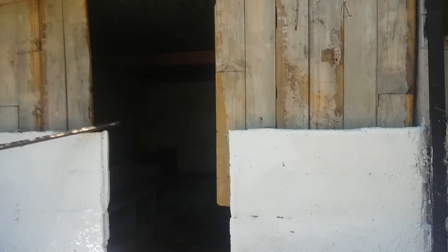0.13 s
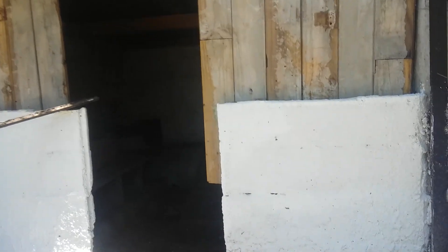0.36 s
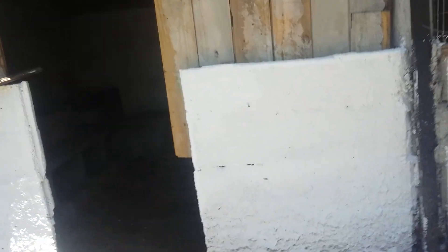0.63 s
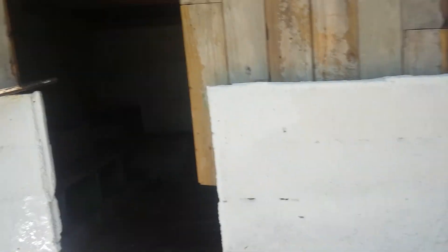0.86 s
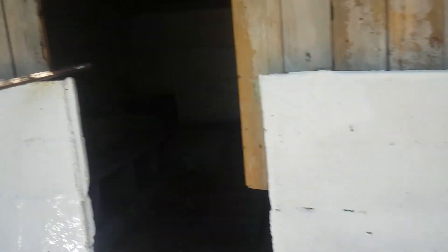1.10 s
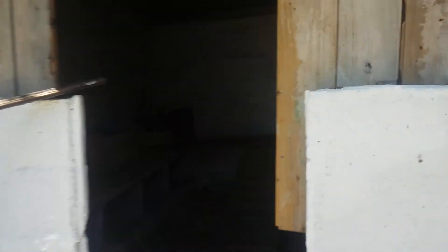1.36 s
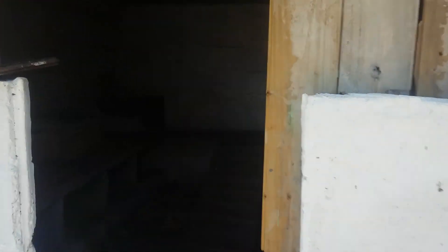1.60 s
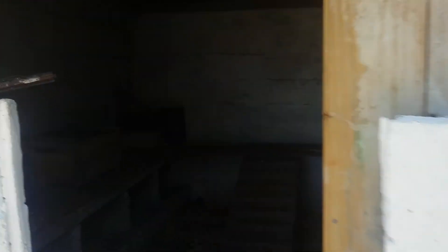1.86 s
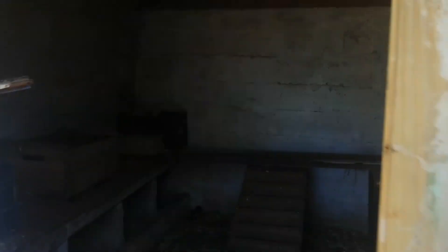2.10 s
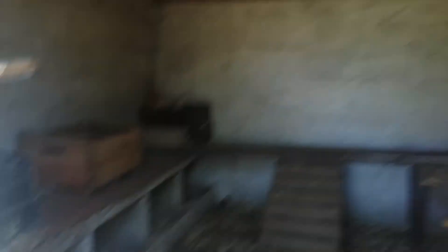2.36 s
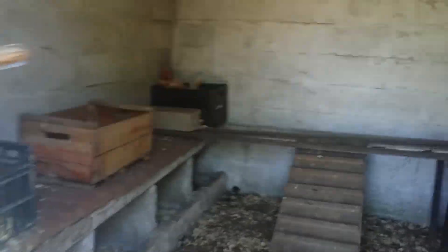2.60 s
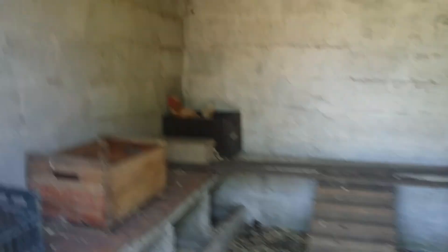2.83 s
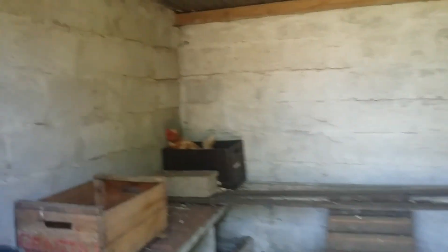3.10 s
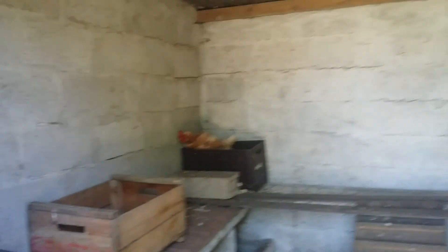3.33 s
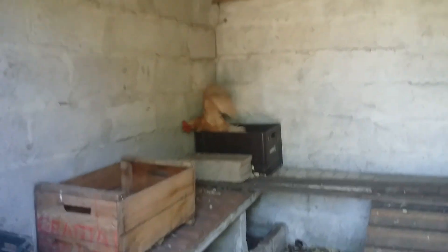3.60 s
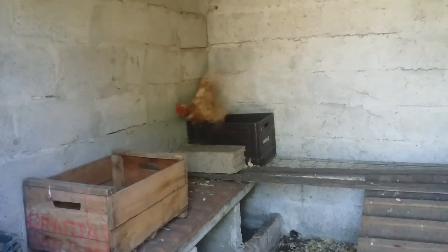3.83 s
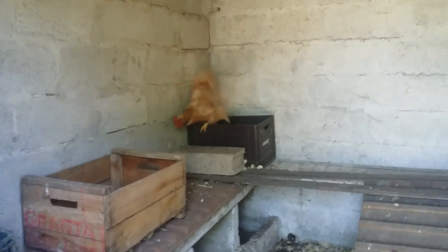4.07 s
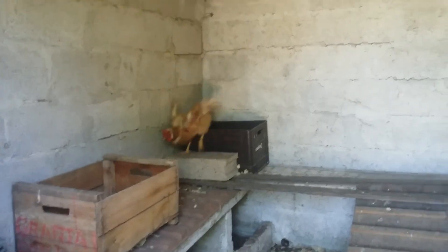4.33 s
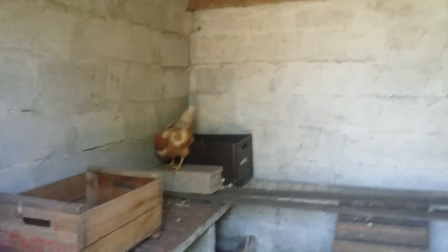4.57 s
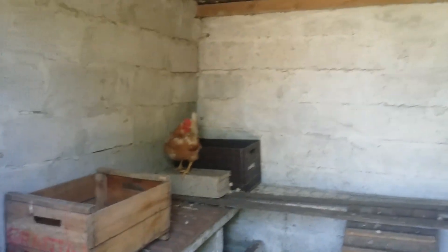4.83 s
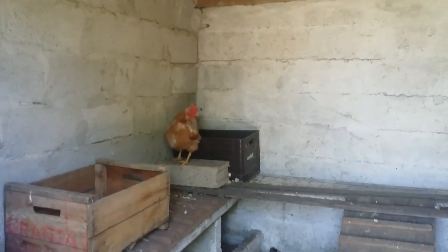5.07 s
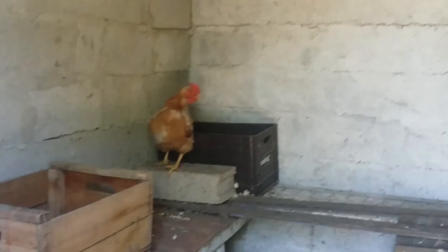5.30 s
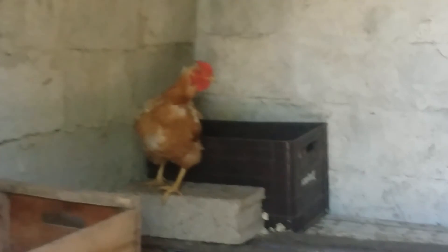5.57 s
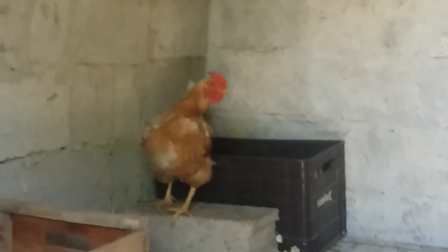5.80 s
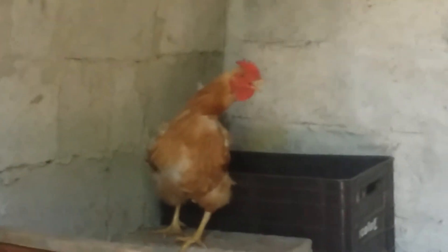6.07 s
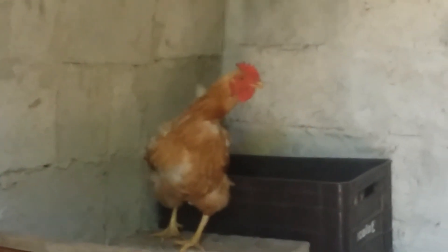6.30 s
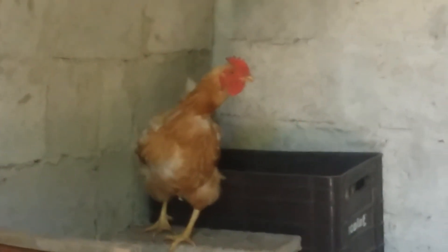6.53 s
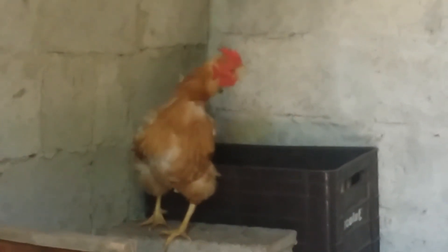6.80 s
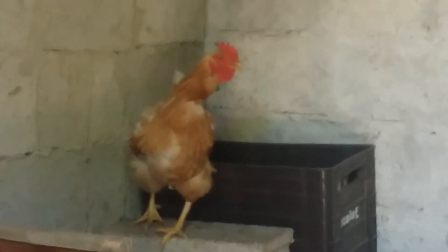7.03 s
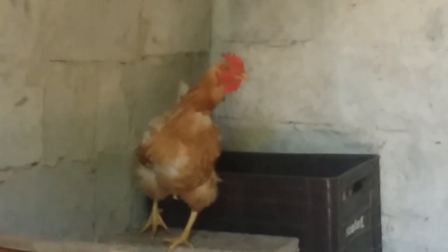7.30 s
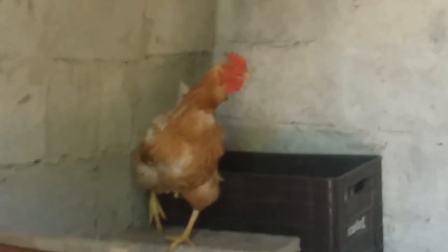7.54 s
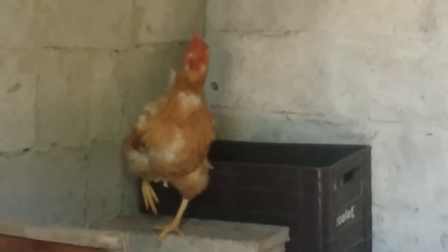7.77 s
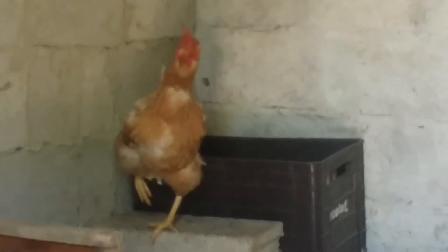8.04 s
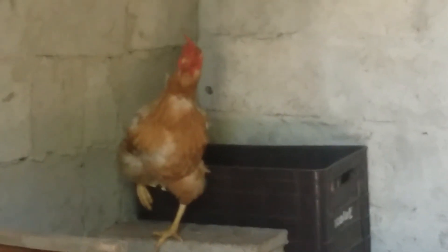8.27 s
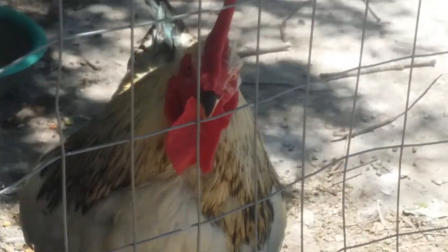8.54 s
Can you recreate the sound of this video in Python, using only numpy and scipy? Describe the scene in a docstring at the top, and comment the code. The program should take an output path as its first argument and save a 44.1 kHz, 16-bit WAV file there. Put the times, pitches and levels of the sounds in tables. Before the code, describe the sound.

A handheld microphone moves into a small block-walled coop, wind rumbling in uneven gusts over a soft yard hush. In the first 1.5 seconds, dull knocks and gritty scuffs mix with low hen clucks, soft fowl murmurs and faint falling sparrow chirps. From 1.5 to 2 seconds the hen gives a long cry that roughens into a rasp, then a firmer cluck at 2.2. A second fowl squeals thin and high around 2.5 and faintly at 2.8. From 3.7 to 4.2 wings beat in airy puffs as a loud squawk breaks into pieces, followed by a short yelp at 4.3. Quieter clucks lead to a hard knock near 5.15 and another held cry until 5.6. Then come steady, stronger clucks with loud, higher cackles at about 6.1, 6.9, 7.3 and 7.7. At 8.47 a dry click cuts the birds off; their brief echo fades, a small scuff follows and wind continues.

```python
"""Wind rumbles on a hand-held microphone carried into a small block-walled coop (shaped noise); feet scuff and knock.
Fowl murmur, sparrows chirp outside (falling tones) and a hen clucks, then cries (throat pulses and hissing air).
A second fowl squeals by the door; the hen flaps out of a crate (noise puffs), squawking, and yelps.
She cries again, then cackles among her clucks. Near the end the birds are cut off with a dry click
and their echo dies away, while the wind goes on."""
import sys
import numpy as np
from scipy import signal
from scipy.fft import rfft, irfft, next_fast_len
from scipy.io import wavfile
from scipy.ndimage import uniform_filter1d, minimum_filter1d, map_coordinates

SR = 44100
rng = np.random.default_rng(int(sys.argv[2]) if len(sys.argv) > 2 else 0)


def output_pcm(signal):
    """Save a mono or channel-first signal as 16-bit PCM at the path in sys.argv[1].

    Samples are clipped to [-1, 1] before scaling.
    """
    pcm = np.clip(np.atleast_2d(signal).T, -1, 1) * 32767
    wavfile.write(sys.argv[1], SR, np.round(pcm).astype(np.int16))


def gain_from_db(level_db):
    """Convert decibel levels to linear amplitude factors (20 dB per decade)."""
    decades = np.asarray(level_db, float) / 20
    return 10 ** decades


N = 381465  # length in samples


def unit(x):
    """Scales a sound to an average (rms) strength of 1."""
    return x / np.sqrt(np.mean(x ** 2) + 1e-20)


def along(points, hz):
    """Reads a curve of (Hz, value) points, with frequency on a log scale."""
    f, v = np.transpose(points)
    return np.interp(np.log(hz + 1), np.log(f + 1), v)


def wobble(rate, size):
    """Draws a smooth random curve with rate random points a second."""
    points = rng.standard_normal(int(size * rate / SR) + 4)
    return map_coordinates(points, [np.arange(size) * rate / SR])


def coloured(x, spectrum):
    """Filters x to the given (Hz, dB) colour without any ringing ahead of the sound."""
    m = 2 * next_fast_len(len(x) // 2 + 2048)
    gain = gain_from_db(along(spectrum, np.fft.rfftfreq(m, 1 / SR)))
    # folding the cepstrum forward in time makes the filter react only after its input
    cepstrum = irfft(np.log(gain + 1e-6), m)
    cepstrum[1:m // 2] *= 2
    cepstrum[m // 2 + 1:] = 0
    return irfft(rfft(x, m) * np.exp(rfft(cepstrum)), m)[:len(x)]


def noise(size, spectrum):
    """Makes random noise of the given (Hz, dB) colour."""
    return coloured(rng.standard_normal(size), spectrum)


def add(track, start, x):
    """Mixes x into the track from sample start."""
    track[start:start + len(x)] += x[:len(track) - start]


def spans(calls):
    """Gives each call's first sample and one value per sample for each column."""
    for rows in calls:
        s, *columns = np.transpose(rows)
        t = np.arange(round(s[0] * SR), round(s[-1] * SR)) / SR
        yield round(s[0] * SR), [np.interp(t, s, c) for c in columns]


def resonance(x, hz, width_hz, lift_db):
    """Lifts a band whose centre moves with time, as a mouth changing shape does."""
    f, t, z = signal.stft(x, SR, nperseg=512, noverlap=384)
    centre = np.interp(t * SR, np.arange(len(x)), hz)
    lift = gain_from_db(lift_db * np.exp(-((f[:, None] - centre) / width_hz) ** 2))
    return signal.istft(z * lift, SR, nperseg=512, noverlap=384)[1][:len(x)]


def voice(calls, throat, throb, jitter, flutter_db, lift_db):
    """Pulses at twice the half pitch; a slower swing shifts and sizes them; air hisses at each pulse."""
    out = np.zeros(N)
    for start, (db, hz, uneven, rough, beak_db, mouth_hz) in spans(calls):
        n = len(db)
        uneven, rough = np.clip(uneven, 0, 2.5), np.clip(rough, 0, 1)
        # the voice breaks up where it is faint
        rough = np.maximum(rough, np.clip((db.max() - db - 5.5) / 22, 0, 0.8))
        shaky_hz = hz * (1 + jitter * rough * wobble(120, n) + 0.0031 * wobble(25, n))
        turn = 2 * np.pi * np.cumsum(shaky_hz) / SR
        swing = throb * turn + rng.uniform(0, 2 * np.pi)

        overtone = np.arange(1, 7200 // hz.max())[:, None]
        phase = overtone * (2 * turn + 0.62 * uneven * np.sin(swing))
        buzz = np.cos(phase + rng.uniform(0, 3.46, overtone.shape)).sum(0)
        # the swing fills in lines between the overtones
        buzz = buzz * (1 + 0.45 * uneven * np.cos(swing))
        hiss = rng.standard_normal(n) * (1 + 0.83 * np.cos(2 * turn)) * (1 + 0.5 * np.cos(swing))

        tone = unit(resonance(coloured(buzz, throat), mouth_hz, 150, lift_db))
        breath = unit(resonance(coloured(hiss, throat), mouth_hz, 150, lift_db))
        flutter = gain_from_db(flutter_db * rough * np.tanh(wobble(59, n)))
        sound = (np.sqrt(1 - rough) * tone + np.sqrt(rough) * breath) * flutter
        # a wider beak lets more treble out
        bright = coloured(sound, [(1200, -43.5), (1900, -1.5), (5000, 2.5)])
        ends = np.minimum(1, np.minimum(np.arange(n), n - np.arange(n)) / 70)
        add(out, start, gain_from_db(db) * ends * (sound + (gain_from_db(beak_db) - 1) * bright))
    return out


def by_rule(rows, jump_s, onset_db, jump_db, hold_s, sag_db, release_s, end_db, climb, sink,
            uneven, rough, beak_db, peak_beak_db, beak_per_db):
    """A call jumps in, swells to its peak, sags and dies; its pitch climbs with the swell, then sinks."""
    for s, rise, db, hz, mouth_hz in rows:
        jump = min(jump_s, rise / 2)
        times = s + np.cumsum([0, jump, rise - jump, hold_s, release_s])
        levels = [onset_db, jump_db, 0, sag_db, end_db]  # dB relative to the peak
        lows = [climb, climb, 0, sink / 2, sink]  # share by which the pitch is lowered
        top_db = peak_beak_db + beak_per_db * (db + 18.5)  # the beak's treble depends on loudness
        beaks = [beak_db, beak_db, top_db, top_db, beak_db]
        yield [(t, db + under, hz * (1 - low), uneven, rough, beak, mouth_hz)
               for t, under, low, beak in zip(times, levels, lows, beaks)]


def held(calls, rasp, beak_db, narrows_db):
    """Strain makes a held call uneven and, by the share rasp, rough; it narrows the beak."""
    return [[(s, db, hz, strain, rasp * strain, beak_db - narrows_db * strain, mouth_hz)
             for s, db, hz, strain, mouth_hz in rows] for rows in calls]


def air():
    """Lumpy, gusty wind on the microphone over the soft hush of the yard and the microphone's own hiss."""
    # wind strength before gusts and lumps: time_s, rumble_db
    wind = [(0, -41), (1.5, -44.5), (2.2, -33.5), (2.5, -43), (3.2, -37), (3.4, -51), (3.9, -42.5),
            (5, -46), (5.4, -53), (8.65, -51)]
    # gusts on top, each rising and falling in a straight line: middle_s, lift_db, half_length_s
    gusts = [(.01, 3.5, 0.08), (.65, 7, 0.18), (1.015, 13.5, 0.064), (1.573, 8.5, 0.17), (2.414, 11, 0.08),
             (2.943, 14, .15), (3.225, 2, .05), (3.43, 9.5, 0.055), (3.72, 3, .06), (4.038, 7, 0.19),
             (5.164, 16.5, 0.15), (5.704, 14, 0.062), (5.875, 12.5, 0.092), (7.37, 6.5, 0.097),
             (7.61, 5, .08)]
    # colour of the wind: frequency_hz, gain_db
    rumble_colour = [(15, -51.5), (25, -34), (47, 2.5), (75, 0), (118, 1.5), (177, -7.5), (385, -22.5),
                     (450, -21.5), (580, -59), (990, -120)]
    # strength of the yard's hush: time_s, level_db
    yard = [(0, -44.5), (3.6, -45.5), (4.4, -44.5), (4.65, -54), (5.1, -51), (5.7, -49), (7, -49.5),
            (8.65, -48.5)]
    # colour of the hush: frequency_hz, gain_db
    hush_colour = [(120, -10), (200, 2), (339, -4), (668, -4.5), (1100, -10), (1200, -9), (1740, -10),
                   (2670, -13), (3290, -19.5), (5500, -51), (7150, -82), (12100, -120)]
    # colour of the microphone's own noise: frequency_hz, gain_db
    hiss_colour = [(3000, -14), (6000, -10), (10500, 3.5), (14000, -8.5), (15700, -4.5)]
    t = np.arange(N) / SR
    gusts_db = sum(db * np.clip(1 - np.abs(t - s) / half, 0, 1) for s, db, half in gusts)
    wind_db = np.interp(t, *np.transpose(wind)) + gusts_db
    lumps = gain_from_db(wind_db + 1.7 * wobble(14, N) + 5.2 * wobble(30, N))
    rumble = coloured(lumps * rng.standard_normal(N), rumble_colour) / np.std(noise(N, rumble_colour))
    hush = unit(gain_from_db(1.5 * wobble(7, N)) * noise(N, hush_colour))
    hiss = gain_from_db(-78.5) * unit(noise(N, hiss_colour))
    return rumble + gain_from_db(np.interp(t, *np.transpose(yard))) * hush + hiss


def knocks():
    """Feet and crate: a short dull ring that sinks in pitch, under a puff of low noise."""
    # knocks: start_s, level_db (ring, before it dies), first_pitch_hz, time_to_fall_60_db_s
    hits = [(0.017, -25, 101, 0.12), (0.327, -19.5, 274, 0.018), (3.083, -17.5, 123, 0.03),
            (4.593, -26.5, 304, 0.051), (4.966, -35.5, 332, 0.039), (5.148, -4, 504, 0.024),
            (5.688, -38, 103.4, 0.033), (5.858, -20.5, 113, 0.05), (6.004, -40, 373, 0.046),
            (6.38, -39, 295, 0.031), (8.173, -24, 156, 0.031)]
    sag_s = 0.03  # how slowly the pitch sinks
    out, t = np.zeros(N), np.arange(SR // 5) / SR
    for s, db, hz, t60 in hits:
        puff = unit(noise(len(t), [(hz / 5, -9), (hz, 0), (3 * hz, -12), (5000, -55), (15000, -90)]))
        ring = np.sin(2 * np.pi * hz * sag_s * (1 - np.exp(-t / sag_s)))
        fade = gain_from_db(db - 60 * t / t60) * (1 - np.exp(-t * hz * 3))
        add(out, round(s * SR), fade * (ring + 1.7 * puff))
    return out


def murmurs():
    """Soft low voices from the yard, each swelling briefly from the throat."""
    # murmurs: start_s, rise_to_peak_s, peak_level_db, half_pitch_hz, mouth_resonance_hz
    calls = [(.15, 0.013, -32.5, 133.5, 301), (.525, 0.025, -33, 127.5, 342),
             (.695, 0.011, -33.5, 167.3, 376), (7.1, 0.033, -36, 150, 576), (7.38, 0.056, -34, 151, 660),
             (7.46, 0.069, -33.5, 157.7, 606)]
    # how a murmur unfolds: named times in s, levels in db, the rest shares (see by_rule)
    shape = dict(jump_s=0.0062, onset_db=-15.5, jump_db=-4, hold_s=0.024, sag_db=-6, release_s=0.011, end_db=-24.5, climb=0.038, sink=.01, uneven=.1, rough=0.21, beak_db=-2.5, peak_beak_db=-13, beak_per_db=-1.7)
    # throat colour of a distant hen: frequency_hz, gain_db
    throat = [(150, -14.5), (280, 5), (600, 2), (900, 7.5), (1500, -30), (4000, -60.5)]
    return voice(by_rule(calls, **shape), throat, throb=1, jitter=0.051, flutter_db=3, lift_db=12)


def sparrows():
    """Quick whistles with soft ends that fall fast in pitch, then level out."""
    # whistles: start_s, length_s, first_pitch_hz, last_pitch_hz, level_db (before a random wobble)
    whistles = [(0.153, 0.069, 3800, 2470, -42.5), (0.319, 0.047, 3900, 2680, -39.5),
                (0.494, 0.056, 2760, 2560, -48), (0.703, 0.065, 3000, 2550, -46),
                (2.289, 0.067, 3400, 2340, -41), (2.435, 0.081, 3830, 2390, -42.5),
                (3.281, 0.049, 3840, 2550, -41.5), (3.469, .085, 3990, 2660, -50),
                (4.974, 0.048, 3100, 2310, -55), (5.075, .035, 3030, 2420, -56),
                (5.962, 0.07, 3350, 2790, -55), (6.676, .07, 3050, 2610, -53.5)]
    out = np.zeros(N)
    for s, length, first_hz, last_hz, db in whistles:
        u = np.linspace(0, 1, round(length * SR))
        hz = last_hz + (first_hz - last_hz) * (1 - u) ** 1.7
        swell = gain_from_db(db + 3.3 * wobble(60, len(u))) * np.sin(np.pi * u ** 1.44) ** 0.61
        add(out, round(s * SR), swell * np.sin(2 * np.pi * np.cumsum(hz) / SR))
    return out


def clucks():
    """The hen's short low calls, through a nearly shut beak."""
    # clucks: start_s, rise_to_peak_s, peak_level_db, half_pitch_hz, mouth_resonance_hz
    calls = [(0.3, 0.023, -22.5, 192.3, 960), (0.58, 0.017, -22.5, 202.8, 935),
             (0.847, 0.018, -22.5, 193.4, 956), (1.115, 0.028, -24.5, 191.1, 960),
             (1.368, 0.022, -20.5, 205.6, 960), (2.211, 0.029, -14, 225.2, 1010),
             (2.855, 0.006, -31, 195.2, 770), (2.965, 0.023, -20.5, 194, 945),
             (4.515, 0.028, -21, 198.7, 830), (4.773, 0.055, -19, 202.7, 950),
             (5.117, 0.054, -17, 202.8, 940), (5.743, 0.039, -9.5, 213.6, 836),
             (6.017, 0.043, -12, 188.5, 980), (6.445, 0.0465, -13, 190, 1150),
             (6.645, 0.0074, -29.5, 194.3, 767), (6.75, 0.045, -12.5, 183.8, 1040),
             (7.169, 0.031, -10.5, 208, 897), (7.562, 0.045, -10.5, 195.9, 830),
             (8.015, 0.043, -11, 182.2, 1154), (8.345, 0.042, -11.5, 184.5, 1110),
             (8.462, .012, -17.5, 189.9, 1095)]
    # how a cluck unfolds: named times in s, levels in db, the rest shares (see by_rule)
    shape = dict(jump_s=0.0058, onset_db=-14.5, jump_db=-9, hold_s=0.027, sag_db=-10, release_s=0.068, end_db=-34, climb=0.0422, sink=.02, uneven=0.48, rough=0.35, beak_db=3, peak_beak_db=-12, beak_per_db=-2)
    # colour of throat and shut beak: frequency_hz, gain_db
    throat = [(88, -77), (150, -21), (362, -28.5), (593, -19), (753, -6), (991, -0.5), (1110, -5),
              (1220, -6.5), (1520, -25), (1800, -19), (2000, -19), (2280, -31), (2560, -23.5), (2760, -27),
              (3180, -47), (3650, -33), (4050, -42), (4900, -63), (5700, -57), (6550, -75), (12000, -62),
              (15600, -105), (22000, -120)]
    return voice(by_rule(calls, **shape), throat, throb=0.95, jitter=0.051, flutter_db=2.2, lift_db=4.4)


def scuffs():
    """Gritty bursts of noise that die fast."""
    # scuffs and ticks: start_s, level_db (lowered by 10 dB below), time_to_fall_60_db_s
    bursts = [(0.9735, -24, 0.061), (1.338, -19, 0.12), (2.105, -11.5, 0.019), (2.176, -24.5, 0.057),
              (2.6728, -16.5, 0.14), (3.1257, -28.5, 0.21), (3.212, -30.5, 0.16), (4.8625, -14.5, 0.039),
              (5.1446, -12.5, 0.035), (8.571, -23.5, 0.085)]
    # colour of the grit: frequency_hz, gain_db
    grit = [(300, -9.5), (1500, 9), (3000, 5), (5000, -17.5), (9000, -39.5), (15500, -39.5)]
    out, t = np.zeros(N), np.arange(SR // 5) / SR
    for s, db, t60 in bursts:
        fade = gain_from_db(db - 10 - 60 * t / t60) * (1 - np.exp(-t / 0.0053))
        add(out, round(s * SR), fade * unit(noise(len(t), grit)))
    return out


def cries():
    """Two long held cries of the hen; strain makes the pulses uneven and adds hissing air."""
    # first cry, which roughens into a rasp: time_s, level_db, half_pitch_hz, strain, mouth_resonance_hz
    rasping = [(1.5, -42, 278.4, .3, 1133), (1.512, -20.5, 267, 1.2, 1176), (1.545, -12, 279.7, .12, 1225),
               (1.598, -14.5, 282.4, 0.044, 1120), (1.662, -12.5, 275.5, 0.035, 1120),
               (1.68, -13.5, 284.1, 1.66, 1250), (1.768, -11, 288, 1.93, 1340),
               (1.904, -10, 291.9, 2.2, 1303), (1.935, -18, 293, 2.7, 1260), (2.02, -42, 299, 1.5, 1214)]
    # second cry: time_s, level_db, half_pitch_hz, strain, mouth_resonance_hz
    second = [(5.21, -37, 263.4, 1.2, 1076), (5.222, -16.5, 261.8, 1.05, 1067),
              (5.236, -14, 276.2, 1.2, 1080), (5.258, -14.5, 276.2, 0.87, 1340),
              (5.364, -12, 272.1, 0.07, 1213), (5.426, -11, 273, 0.72, 1420), (5.5, -10, 271.7, 1, 1290),
              (5.542, -18.5, 279, 0.98, 910), (5.63, -50.5, 278, 0.8, 984)]
    # throat colour of the first cry, beak gaping: frequency_hz, gain_db
    gaping = [(210, -89), (350, -43.5), (473, -61.5), (572, -12), (761, -16.5), (1150, 6.5), (1510, -11.5),
              (2270, -5), (2720, -22), (3380, -19), (3900, -33), (4950, -45), (13200, -59.5),
              (15500, -85.5)]
    # throat colour of the second cry, beak wide: frequency_hz, gain_db
    wide = [(150, -70.5), (250, -12.5), (366, -46), (755, -2.5), (1010, 0), (1410, -5), (1990, -9),
            (3330, -17), (3760, -35), (4320, -35), (6420, -49.5), (10600, -53.5), (15500, -84)]
    first_call = held([rasping], rasp=0.16, beak_db=3.8, narrows_db=0.99)
    second_call = held([second], rasp=0.12, beak_db=-1.2, narrows_db=0.091)
    return (voice(first_call, gaping, throb=0.67, jitter=0.03, flutter_db=3.7, lift_db=2.5)
            + voice(second_call, wide, throb=0.96, jitter=0.043, flutter_db=11, lift_db=9))


def squeals():
    """A second fowl by the door squeals twice, in a thin high voice."""
    # two squeals, each with rows of: time_s, level_db, half_pitch_hz, strain, mouth_resonance_hz
    calls = [
        [(2.512, -45, 436, 0.2, 1800), (2.526, -26, 436.6, 0.22, 1780), (2.55, -27.5, 457, 0.08, 1730),
         (2.656, -26.5, 446.2, 0, 1630), (2.7, -43.5, 440, 0.3, 1770)],
        [(2.805, -46, 347, 0, 1430), (2.826, -36, 354, 0.4, 1450), (2.85, -54, 368, 0, 1430)],
    ]
    # thin throat colour: frequency_hz, gain_db
    throat = [(350, -74), (600, -73), (879, -6.5), (1070, -8), (1840, -16), (2180, -25), (2660, -8),
              (3040, -44), (3650, -14), (4060, -31), (5420, -42), (11800, -60), (14000, -89)]
    strained = held(calls, rasp=0.52, beak_db=3, narrows_db=0.092)
    return voice(strained, throat, throb=0.64, jitter=0.02, flutter_db=3, lift_db=14.8)


def wings():
    """Each beat pushes a low puff of air and rushes through the feathers."""
    # wing beats: start_s, push_level_db, feather_rush_level_db (both before they die away)
    beats = [(3.681, -24, -31), (3.715, -20, -28), (3.774, -23, -16.5), (3.806, -22, -26.5),
             (3.888, -19, -23.5), (3.968, -17, -22.5), (4.034, -13.5, -21.5), (4.1, -8.5, -15),
             (4.15, -19, -19.5), (4.199, -34.5, -35), (4.356, -30.5, -51)]
    # colour of the rush: frequency_hz, gain_db
    feathers = [(200, -38), (600, 5), (2000, -1.5), (3500, -9.5), (5000, -30.5), (6500, -38),
                (10000, -29.5), (12500, -38.5), (15500, -49)]
    out, t = np.zeros(N), np.arange(SR // 5) / SR
    for s, push_db, rush_db in beats:
        push = unit(noise(len(t), [(80, -14.5), (190, 11.5), (280, 3.5), (500, -34.5), (3000, -89.5)]))
        rush = unit(noise(len(t), feathers)) * gain_from_db(3 * wobble(70, len(t)))
        add(out, round(s * SR), gain_from_db(push_db - 60 * t / 0.13) * (1 - np.exp(-t / 0.0077)) ** 2 * push)
        add(out, round(s * SR), gain_from_db(rush_db - 60 * t / 0.16) * (1 - np.exp(-t / 0.004)) * rush)
    return out


def squawks():
    """A strained squawk of the hen, shaken into pieces by the jolts of her wings."""
    # one piece to each jolt: start_s, rise_to_peak_s, peak_level_db, half_pitch_hz, mouth_resonance_hz
    calls = [(3.815, 0.026, -8.5, 309, 1080), (3.885, .035, -5.5, 297.2, 1210),
             (3.968, 0.032, -7, 255.1, 1190), (4.03, .03, -6, 273.2, 1040),
             (4.12, .045, -10.5, 309.8, 1050)]
    # how a piece unfolds: named times in s, levels in db, the rest shares (see by_rule)
    shape = dict(jump_s=0.011, onset_db=-14, jump_db=-5.5, hold_s=0.025, sag_db=-7, release_s=0.036, end_db=-24.5, climb=0.0791, sink=0.078, uneven=0.52, rough=0.4, beak_db=-2, peak_beak_db=0, beak_per_db=0.08)
    # strained throat colour: frequency_hz, gain_db
    throat = [(180, -82.5), (300, -19.5), (454, -32.5), (676, -10), (818, -6.5), (1130, -3), (2000, -21),
              (2380, -13.5), (2880, -24.5), (3430, -18.5), (4360, -49.5), (9660, -59), (12500, -65),
              (15000, -97.5)]
    return voice(by_rule(calls, **shape), throat, throb=0.7, jitter=0.06, flutter_db=7.1, lift_db=4.5)


def yelp():
    """One clear short call of the hen with fairly even pulses, from a pinched throat."""
    # the yelp: start_s, rise_to_peak_s, peak_level_db, half_pitch_hz, mouth_resonance_hz
    calls = [(4.288, 0.038, -15, 240, 893)]
    # how it unfolds: named times in s, levels in db, the rest shares (see by_rule)
    shape = dict(jump_s=0.012, onset_db=-26, jump_db=-7.5, hold_s=0.044, sag_db=-16, release_s=0.067, end_db=-47.5, climb=0.0675, sink=0.012, uneven=0.053, rough=0.25, beak_db=-4, peak_beak_db=-1.4, beak_per_db=2.8)
    # pinched throat colour: frequency_hz, gain_db
    throat = [(240, -43), (400, -11.5), (599, -18.5), (970, 1.5), (1180, -19), (1420, -6.5), (2640, -24),
              (3430, -18), (3810, -38), (6410, -69), (9000, -63), (11700, -95), (19800, -120)]
    return voice(by_rule(calls, **shape), throat, throb=0.98, jitter=0.05, flutter_db=2.9, lift_db=6.4)


def cackles():
    """Loud, higher calls of the hen through an open beak."""
    # cackles: start_s, rise_to_peak_s, peak_level_db, half_pitch_hz, mouth_resonance_hz
    calls = [(6.14, 0.047, -7.5, 284.2, 1115), (6.884, 0.047, -8.5, 290.7, 1140),
             (7.272, 0.044, -7.5, 289.2, 1110), (7.682, 0.0477, -7.5, 284, 1130)]
    # how a cackle unfolds: named times in s, levels in db, the rest shares (see by_rule)
    shape = dict(jump_s=.011, onset_db=-19, jump_db=-4.5, hold_s=0.051, sag_db=-5, release_s=0.11, end_db=-38, climb=0.0596, sink=.03, uneven=0.66, rough=0.34, beak_db=1, peak_beak_db=-1, beak_per_db=0.21)
    # colour of throat and open beak: frequency_hz, gain_db
    throat = [(150, -78.5), (250, -31), (482, -32.5), (563, -20.5), (717, -20), (897, 3.5), (1030, -11.5),
              (1140, 2), (1610, -16), (1820, -12.5), (2050, -5.5), (2280, -11), (2550, -22.5),
              (2900, -16.5), (4550, -43), (12400, -72.5), (15500, -101)]
    return voice(by_rule(calls, **shape), throat, throb=1, jitter=0.0732, flutter_db=0.97, lift_db=0.68)


def click():
    """One dry click: a jump of only five samples."""
    # the click: start_s, level_db (before the 0.5 dB cut and the sample sizes below)
    snaps = [(8.474, -16)]
    out = np.zeros(N)
    for s, db in snaps:
        add(out, round(s * SR), gain_from_db(db - 0.5) * np.array([0.2, 0.43, -0.3, -0.63, -0.71]))
    return out


def coop(x):
    """The block walls answer a moment later; each frequency dies at its own speed."""
    # how long the echo lasts: frequency_hz, time_to_fall_60_db_s
    decay = [(200, 0.62), (1000, 0.15), (4000, 0.19), (12000, 0.065)]
    hz, t, z = signal.stft(rng.standard_normal(SR // 2), SR, nperseg=256)
    tail = signal.istft(z * gain_from_db(-60 * t / along(decay, hz)[:, None]), SR, nperseg=256)[1]
    late = np.pad(x, (250, 0))  # delay in samples
    return signal.fftconvolve(late, tail / np.linalg.norm(tail))[:N]


def scene():
    """Birds sound until the cut and their echo dies away; wind and handling are at the microphone."""
    cut_s = 8.4745
    hen = clucks() + cries() + squawks() + yelp() + cackles()
    birds = hen + murmurs() + sparrows() + squeals() + wings()
    birds = birds * (np.arange(N) < cut_s * SR)
    return (air() + knocks() + scuffs() + click() + birds + gain_from_db(-8.5) * coop(birds))[None]


def low_pass(x):
    """Removes everything above the highest recorded frequency."""
    return signal.sosfilt(signal.butter(12, 15820, fs=SR, output="sos"), x)


def record(dry):
    """A low cut thins the deep rumble, a steep high cut removes the top; the loudest peaks are ducked."""
    # colour of the low cut and the steep high cut: frequency_hz, gain_db
    low_and_high_cut = [(20, -41.5), (38, -18), (55, -0.5), (15300, -1), (15900, -42.5)]
    x = coloured(dry[0], low_and_high_cut)
    needed = np.minimum(1, 0.93 / (np.abs(x) + 1e-9))
    # hold each dip for 10 ms, then smooth it over 5 ms
    gain = uniform_filter1d(minimum_filter1d(needed, size=441), size=221)
    return low_pass((x * gain)[None])


dry = scene()
out = record(dry)
output_pcm(out)
```